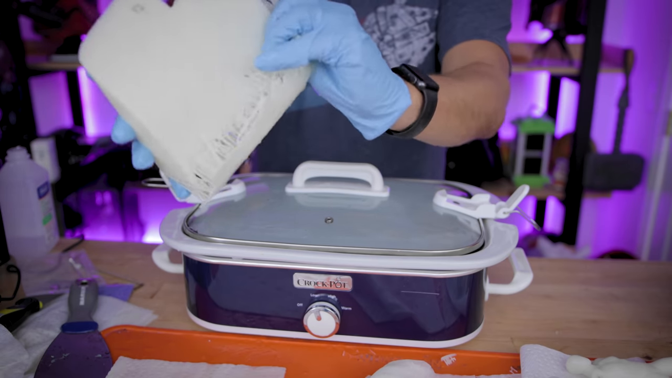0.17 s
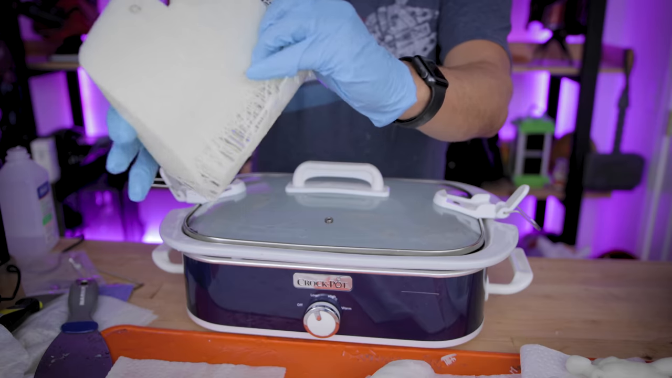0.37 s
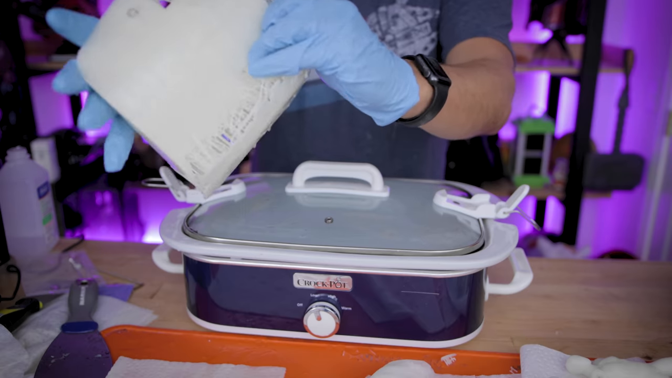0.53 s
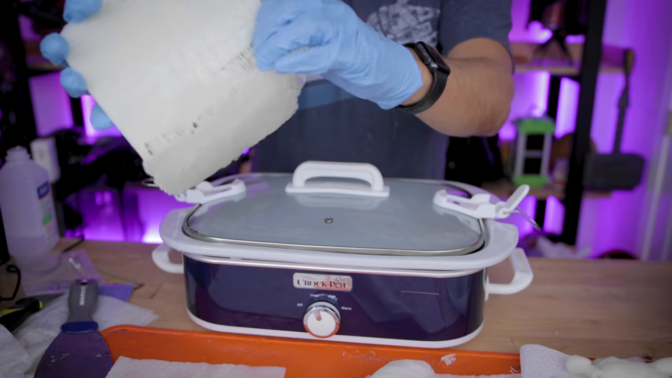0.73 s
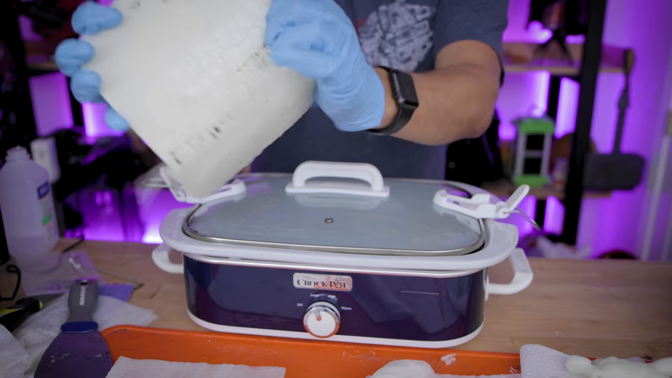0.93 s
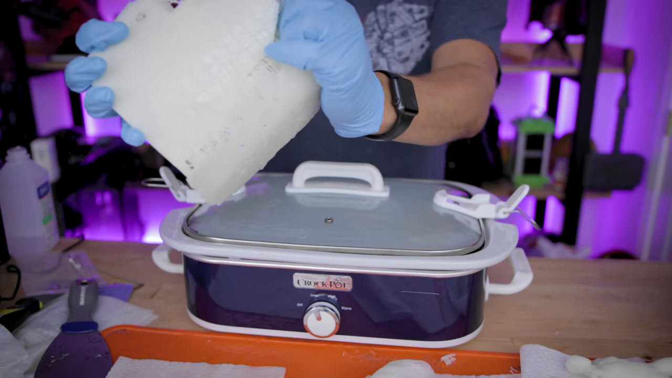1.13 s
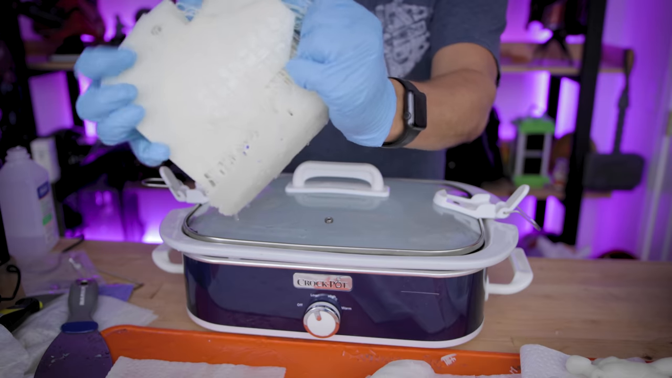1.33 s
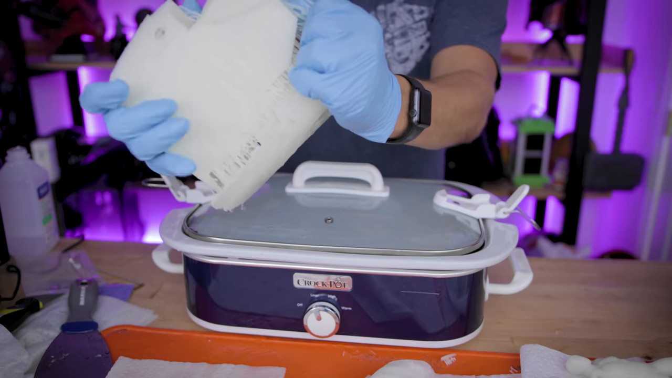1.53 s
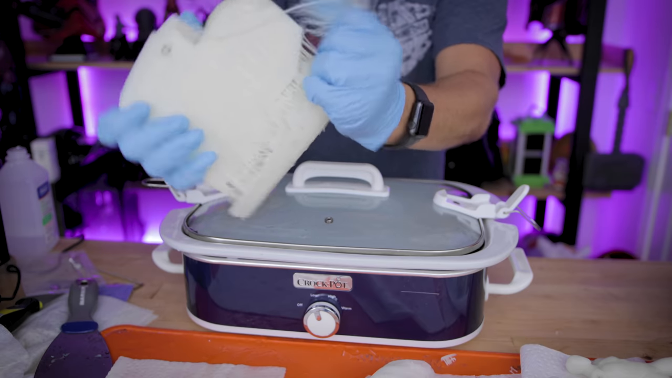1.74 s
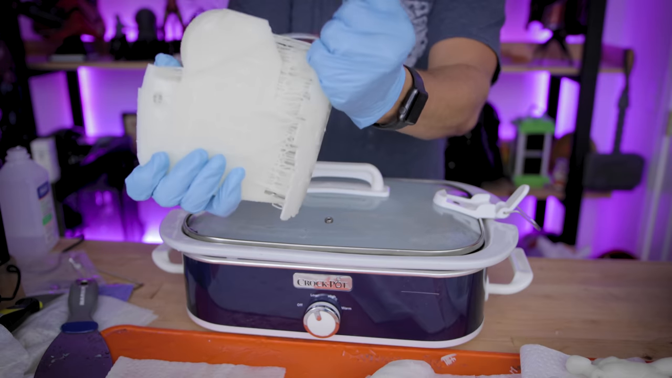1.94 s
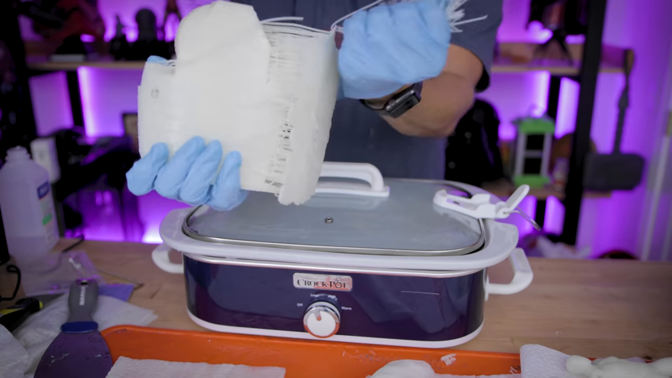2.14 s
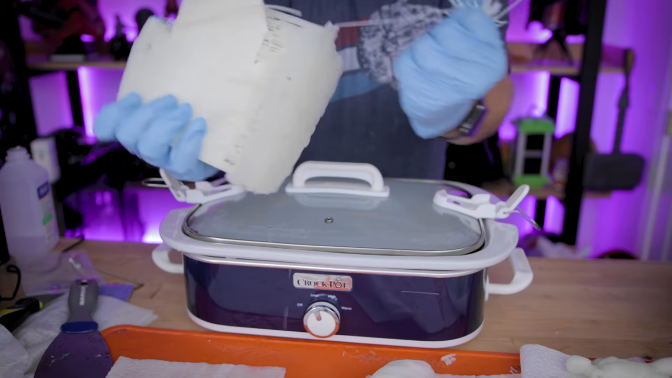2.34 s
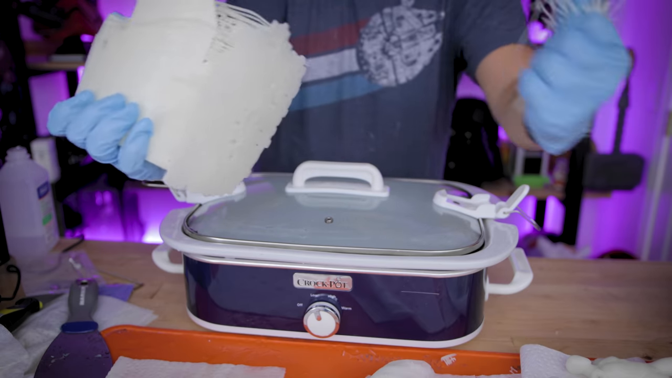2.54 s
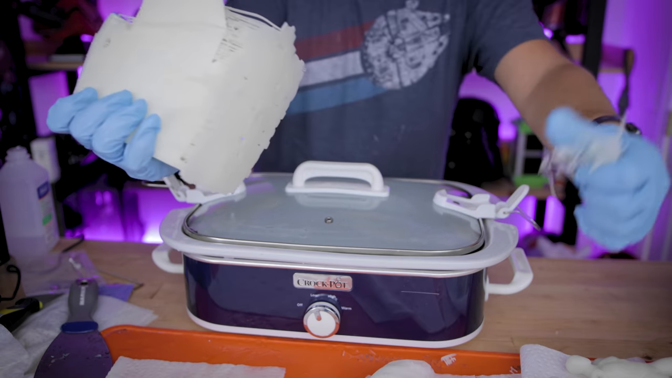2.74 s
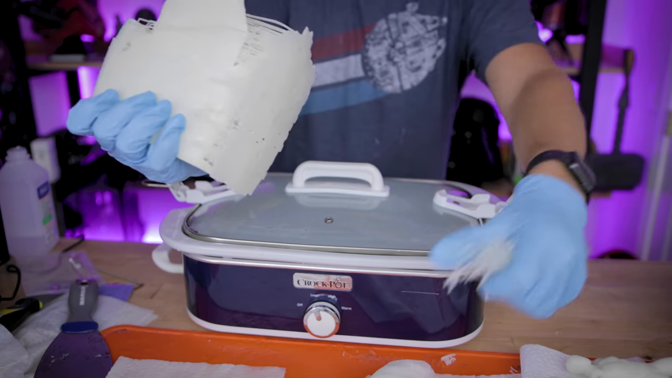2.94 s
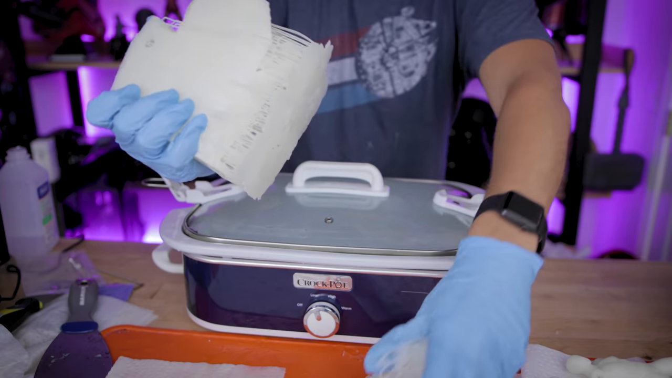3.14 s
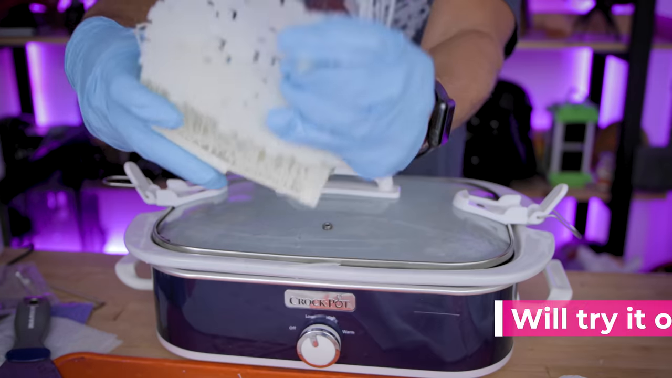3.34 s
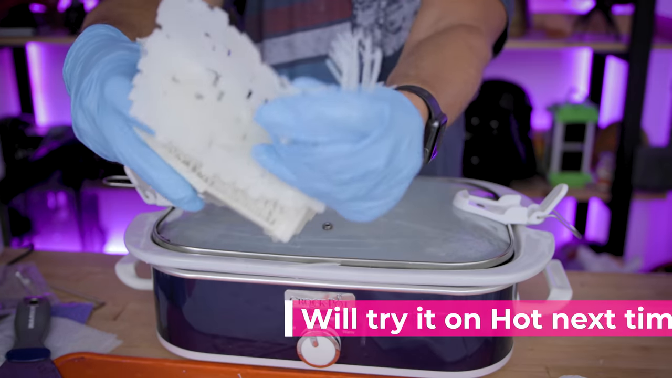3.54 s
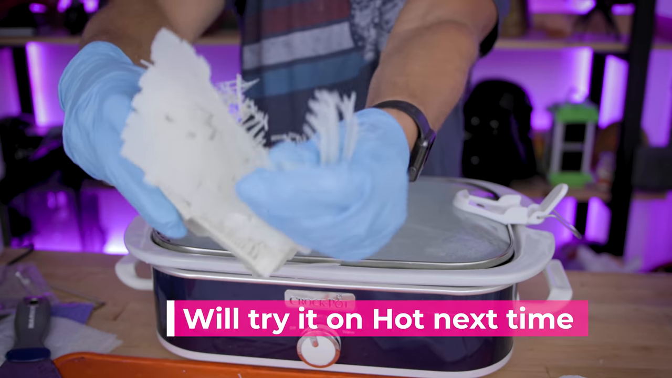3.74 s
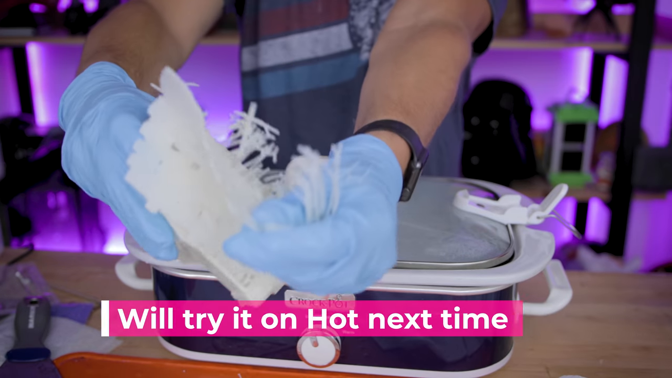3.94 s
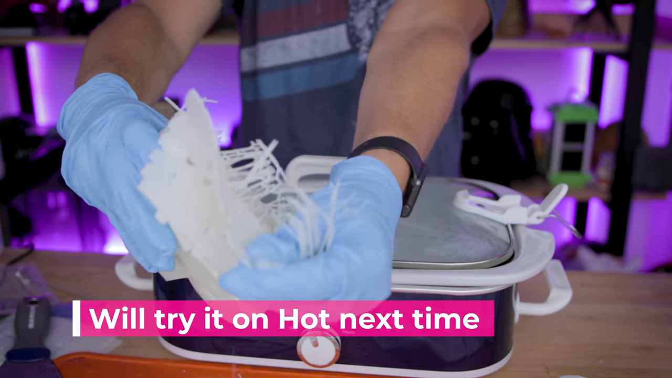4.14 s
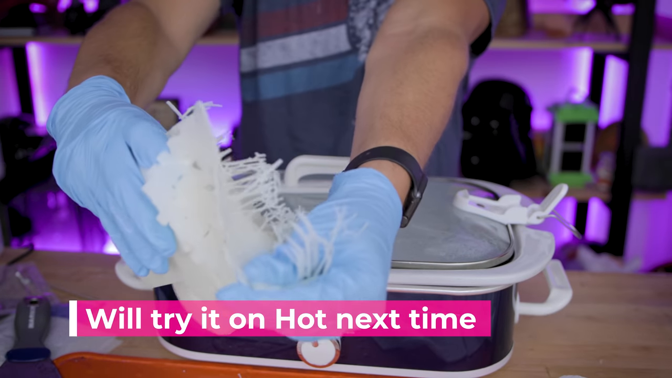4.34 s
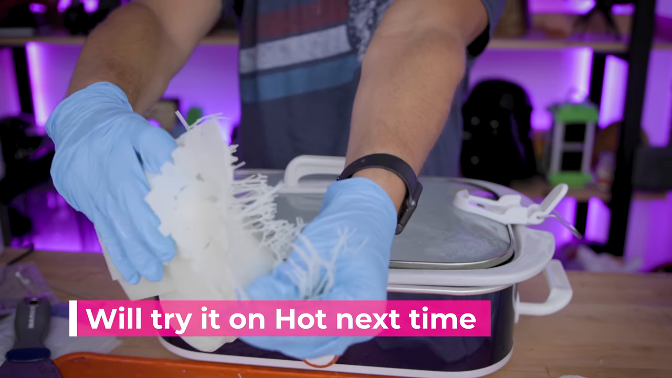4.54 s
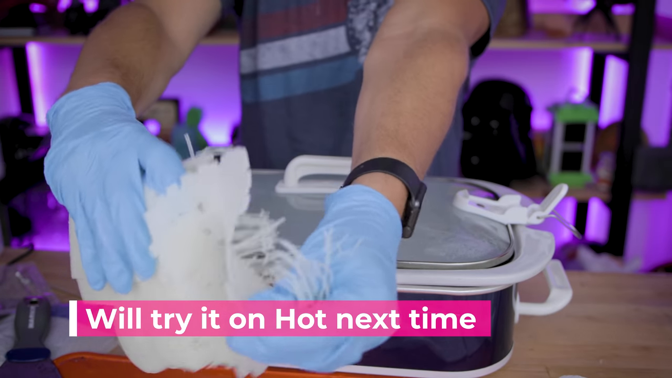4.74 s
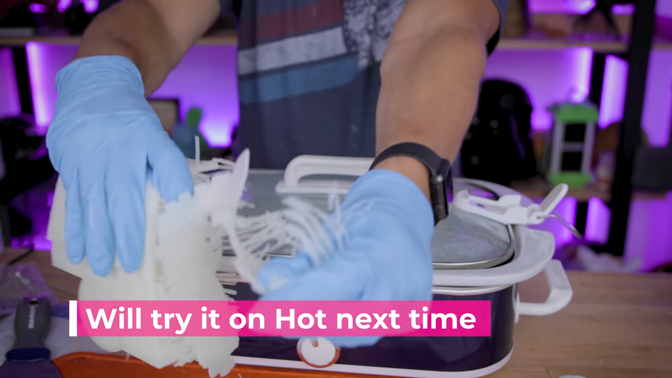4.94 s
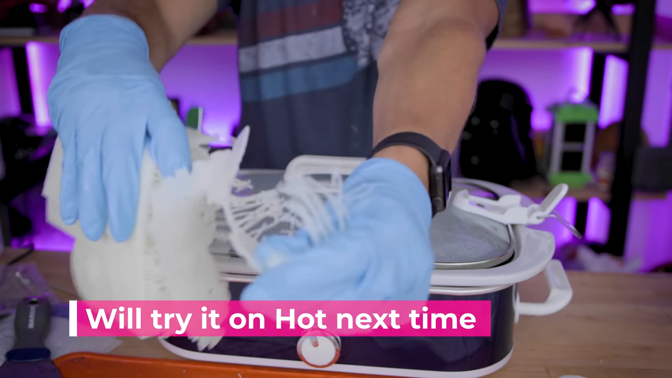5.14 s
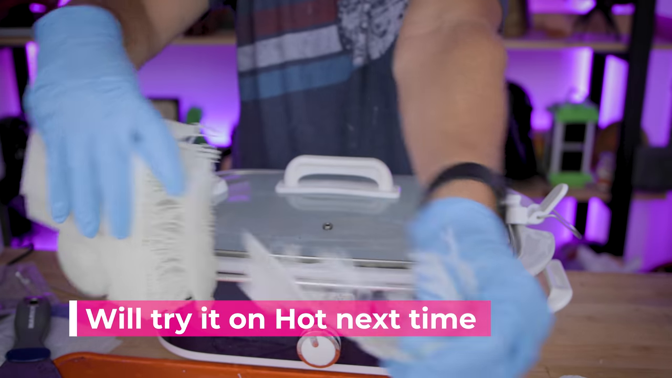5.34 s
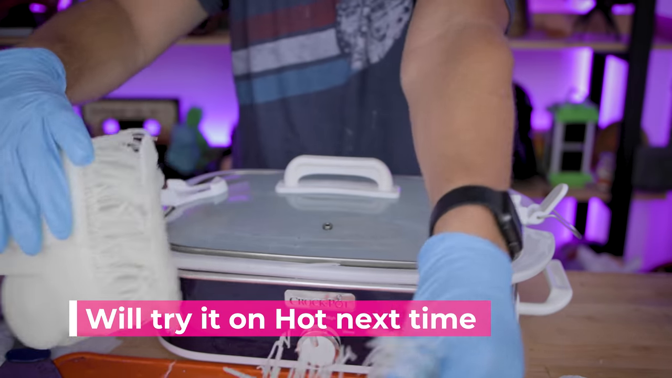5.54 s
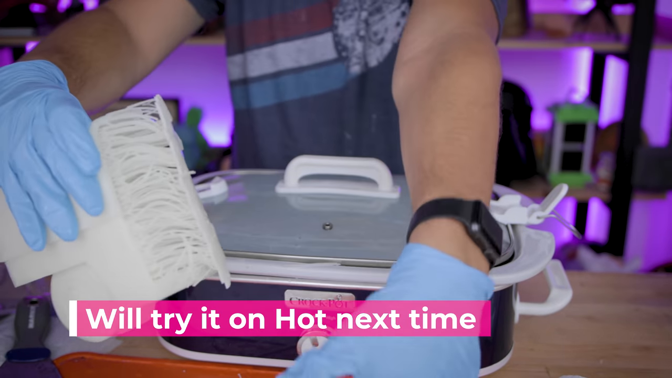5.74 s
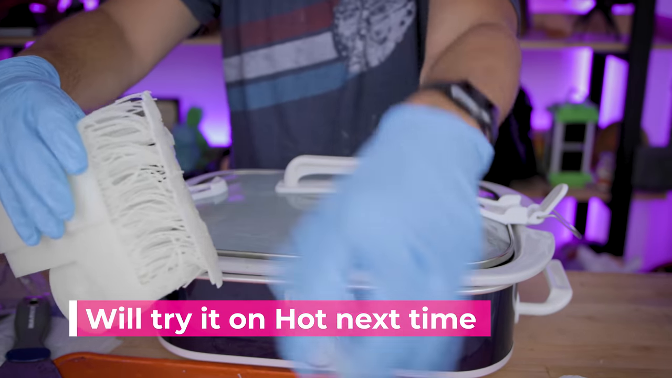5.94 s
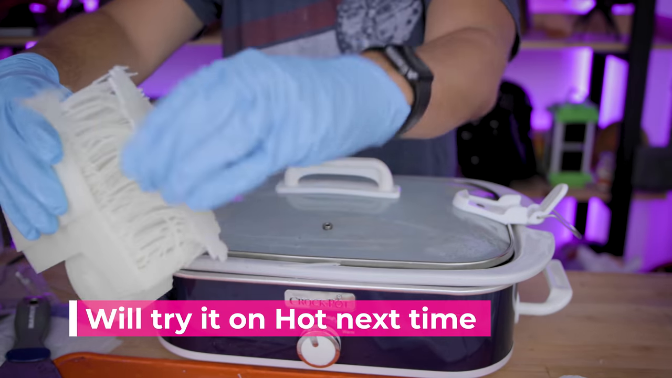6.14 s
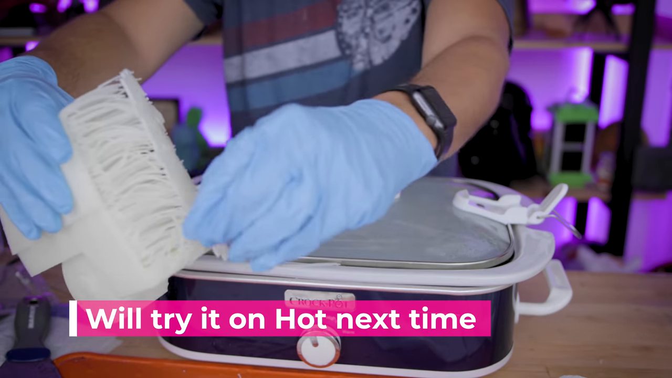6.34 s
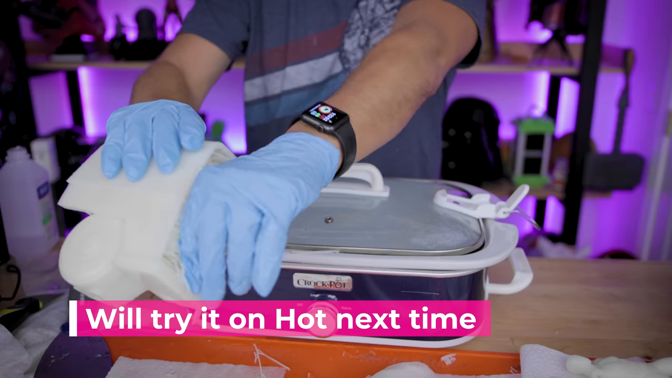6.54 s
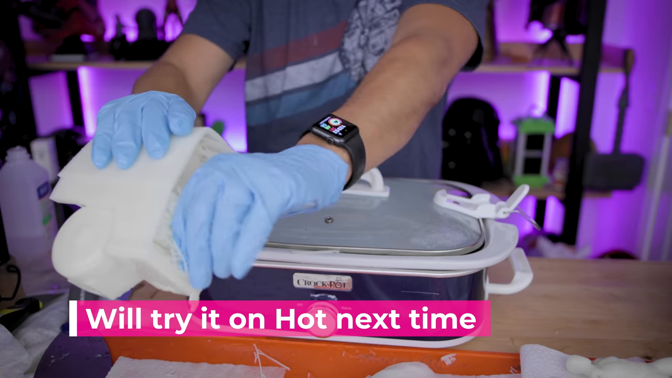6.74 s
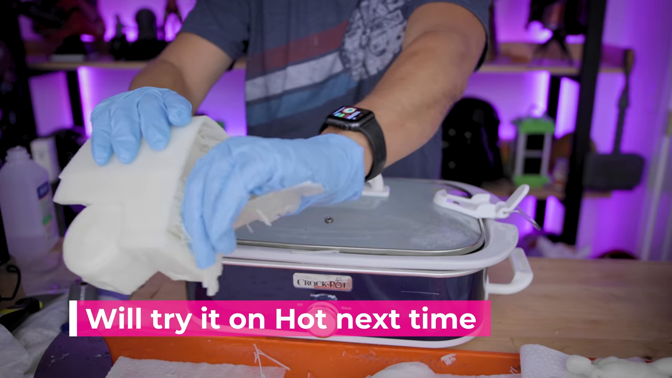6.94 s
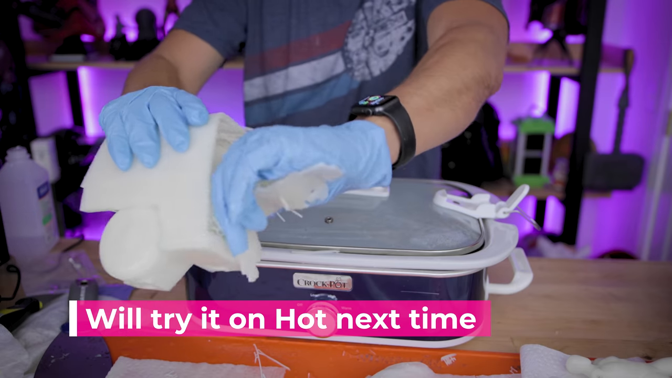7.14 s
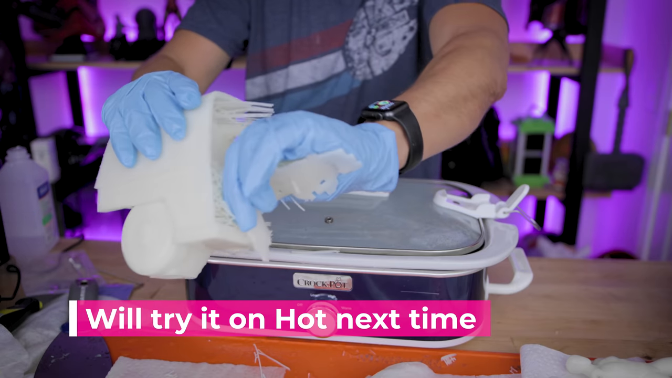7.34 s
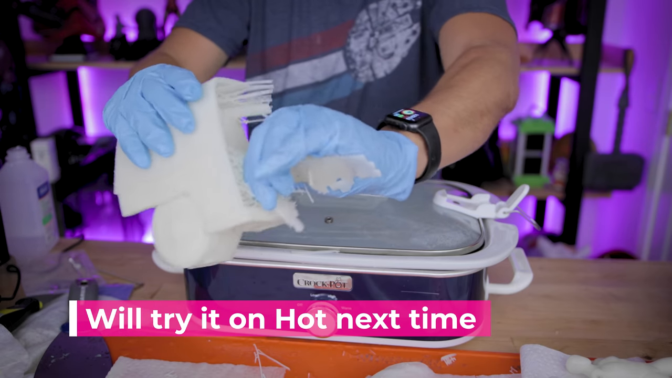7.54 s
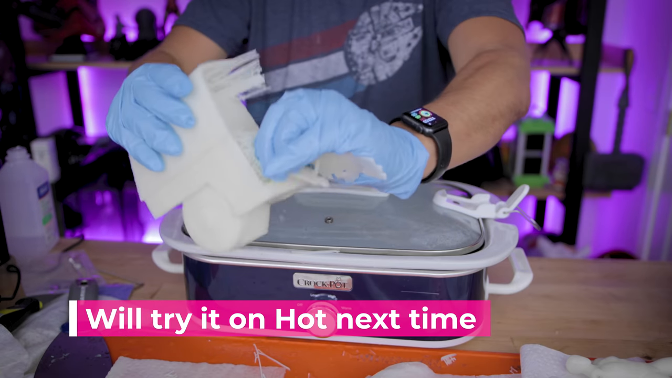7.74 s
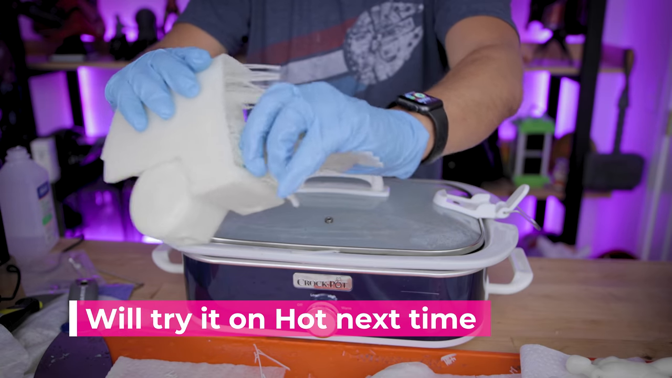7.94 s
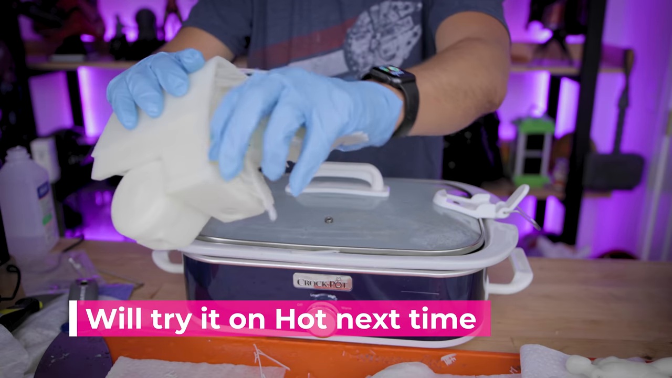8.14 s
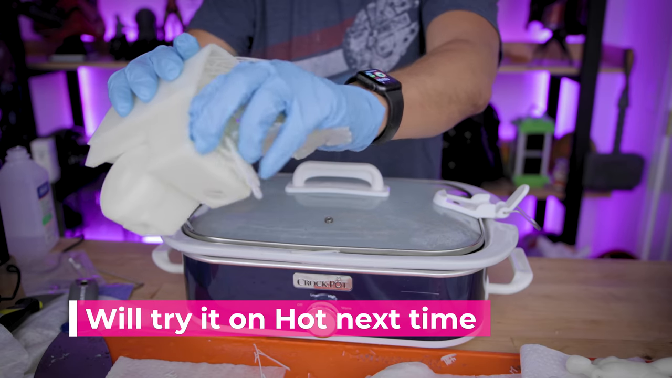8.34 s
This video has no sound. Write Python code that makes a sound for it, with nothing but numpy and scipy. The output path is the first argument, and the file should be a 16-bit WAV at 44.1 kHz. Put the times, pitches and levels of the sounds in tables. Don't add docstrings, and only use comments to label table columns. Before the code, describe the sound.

Brittle plastic struts snap and crackle in sharp bursts as gloved hands tear them off, with rubbery rustle and faint fan hum in a small room.

```python
import sys
import numpy as np
from scipy import signal
from scipy.fft import rfft, irfft
from scipy.io import wavfile
from scipy.ndimage import uniform_filter1d

SR = 44100
rng = np.random.default_rng(int(sys.argv[2]) if len(sys.argv) > 2 else 0)


def file_out(sig):
    cols = np.atleast_2d(sig).T
    lim = np.clip(cols, -1, 1)
    pcm = np.round(lim * 32767).astype(np.int16)
    wavfile.write(sys.argv[1], SR, pcm)


def invert_db(level):
    return 10 ** (np.asarray(level, dtype=float) / 20)


N = 374409


def unit(x):
    return x / np.sqrt(np.mean(x ** 2))


def colour(x, points):
    hz, db = np.transpose(points)
    f = np.maximum(np.arange(len(x) // 2 + 1) * SR / len(x), 1)
    gain = invert_db(np.interp(np.log(f), np.log(hz), db))
    return irfft(rfft(x) * gain, len(x))


def highpass(x, hz, order):
    return signal.sosfilt(signal.butter(order, hz, "high", fs=SR, output="sos"), x)


def walk(rate_hz):
    hold = int(SR / rate_hz)
    steps = np.repeat(rng.standard_normal(N // hold + 1), hold)
    slewed = uniform_filter1d(uniform_filter1d(steps, hold), hold)
    return 0.95 * slewed[:N]


def add(out, times, waves):
    for s, wave in zip(times, waves):
        i = min(max(int(s * SR), 0), len(out) - 1)
        out[i:i + len(wave)] += wave[:len(out) - i]
    return out


def ring(push, modes, chance, detune, scatter_db):
    t = np.arange(push.shape[-1]) / SR
    body = 0
    for k, (hz, db, t60) in enumerate(modes):
        pitch = np.minimum(hz * np.exp(detune * chance[:, [k]]), 0.45 * SR)
        level = invert_db(db + scatter_db * chance[:, [-1 - k]])
        decay = invert_db(-60 * t / np.maximum(t60, 1e-3))
        body = body + level * np.sin(2 * np.pi * pitch * t) * decay
    waves = signal.fftconvolve(push, np.broadcast_to(body, push.shape), axes=-1)[..., :len(t)]
    return waves / np.abs(waves).max(axis=-1, keepdims=True)


def machines():
    # from_s, fan_db, hiss_db, hum_db
    places = [
        (0, -70.5, -75, -74),
        (2.2, -74.5, -80, -70),
        (3.33, -70, -94, -75.5),
        (5.5, -72.5, -88, -74.5),
        (6.489, -73.5, -81, -79.5),
        (8.271, -70.5, -93.5, -83),
    ]
    # hz, db (per Hz)
    fan_colour = [(12, -37), (20, -7), (64, -5), (98, -3), (178, -7), (329, -9.5), (431, -11), (608, -13),
                  (742, -17), (1500, -27), (1950, -57.5), (3300, -120)]
    # hz, db (per Hz)
    hum_colour = [(30, -28.5), (55, -7), (80, -6), (107, 0.5), (128, -7), (180, -34)]
    # hz, db (per Hz)
    hiss_colour = [(4500, -30), (5200, -9), (6500, -11), (7800, -5), (8800, -1), (10000, -6), (11300, 0),
                   (12700, -7), (14000, -1), (15200, -7), (16500, -20)]
    settle_s = 0.05
    t = np.arange(N) / SR
    from_s, *levels = np.transpose(places)
    place = np.maximum(np.searchsorted(from_s, t) - 1, 0)
    fan_db, hiss_db, hum_db = (uniform_filter1d(db[place], int(settle_s * SR)) for db in levels)
    fan = unit(colour(rng.standard_normal(N), fan_colour)) * invert_db(fan_db + 3.5 * walk(28))
    hiss = unit(colour(rng.standard_normal(N), hiss_colour)) * invert_db(hiss_db + 0.92 * walk(23))
    hum = unit(colour(rng.standard_normal(N), hum_colour)) * invert_db(hum_db)
    return fan + hum + hiss


def gloves():
    # middle_s, length_s, rustle_db
    rubs = [(0.046, 0.3, -61), (.39, 0.072, -70), (0.51, 0.1, -65.5), (0.59, 0.051, -66),
            (0.7, 0.13, -75.5), (0.802, 0.051, -64), (0.89, 0.076, -65.5), (1.344, 0.36, -60),
            (1.997, 0.36, -81), (3.13, 0.14, -78.5), (4.307, 0.86, -68), (5.542, 0.28, -70.5),
            (5.808, 0.077, -59.5), (5.938, 0.14, -68), (6.078, 0.11, -75), (6.224, 0.081, -75),
            (6.706, 0.13, -78), (7.284, 0.2, -65), (8.076, 0.11, -69), (8.141, 0.057, -62.5),
            (8.25, 0.054, -68.5), (8.345, 0.025, -86.5), (8.467, 0.033, -86)]
    # hz, db (per Hz)
    rustle_colour = [(410, -16.5), (900, -6), (2500, -1.5), (3350, -2), (3950, 3), (4900, -6.5),
                     (8000, -11), (15400, -31.5)]
    t = np.arange(N) / SR
    creaks = rng.standard_normal(N) * invert_db(1.8 * walk(25) + 4.0 * walk(150))
    motion = invert_db(-75.5)
    for middle_s, length_s, db in rubs:
        motion = motion + invert_db(db) * np.exp(-(2 * (t - middle_s) / length_s) ** 2)
    return unit(colour(creaks, rustle_colour)) * motion


def breaks():
    # start_s, crack_peak_db, shell_rel_db,
    # neighbours_rel_db, freed_hz
    first_pulls = [(0.0054, -25, -7, -9, 1310), (0.0317, -21, -15, -10.5, 2440),
                   (0.062, -34.5, 0, -7, 3610), (0.1333, -23, -8, -8, 3620), (0.1535, -26, -24, -10, 2340),
                   (1.0784, -29, -15, -15.5, 3510), (1.1094, -20.5, -9, -26.5, 3510),
                   (1.1277, -17.5, -11, -8.5, 3830), (1.2768, -30.5, -19, -7.5, 2450),
                   (1.302, -46, 0, 8.5, 1950), (1.3138, -15.5, -18, -10, 3400),
                   (1.4238, -39.5, -26, -18, 4160), (1.4384, -33, -25, -20, 4300),
                   (1.7227, -31.5, -12, -6, 4090), (1.742, -32, -15, -12, 3840),
                   (1.8052, -25.5, -9.5, -14.5, 2420), (1.8294, -13.5, -14, -12, 3670),
                   (1.8577, -19.5, -26, -10.5, 3270), (1.8922, -22, -16, -9, 4000),
                   (1.9018, -31, -17, -12, 2830), (1.9144, -27, -21.5, -19, 3700),
                   (1.961, -41, -25, -6, 3470), (2.066, -35.5, -12, -7, 3280),
                   (2.0838, -32.5, -26, -30, 2920), (2.1294, -33, -6.5, -23, 3100),
                   (2.1579, -22.5, -10, -6.5, 2820), (2.4496, -34.5, -10, -8, 3400)]
    peel_raft = [(3.5769, -17, -15, -6.5, 3600), (3.5987, -23.5, -19, -4.5, 1850),
                 (3.6962, -18, -17.5, -4.5, 5260), (3.7062, -15, -16.5, -23, 3500),
                 (3.7654, -24.5, -15, -6.5, 1850), (3.7953, -17.5, -21, -7.5, 3520),
                 (3.837, -17.5, -14.5, -7, 3460), (3.8448, -27, -11, 3.5, 1910),
                 (3.882, -22, -15, -15, 3460), (3.913, -21, -22.5, -9.5, 3560),
                 (3.9984, -20, -15, -7, 2190), (4.0474, -14, -21.5, -13, 3270),
                 (4.1083, -20.5, -15, -7, 2090), (4.122, -18.5, -19.5, -10.5, 3600),
                 (4.169, -25.5, -16.5, -10.5, 2130), (4.2174, -26.5, -20, -9.5, 1364),
                 (4.2264, -30, -12, -4.5, 1480), (4.2377, -33, -15, -3.5, 2200),
                 (4.25, -20.5, -10, -9.5, 2220), (4.263, -25.5, -14, -5, 2200),
                 (4.2792, -11, -19, -11.5, 4250), (4.2881, -33, -14, -14, 1740)]
    tear_raft = [(4.4016, -13, -16.5, -17.5, 3840), (4.4383, -13.5, -18.5, -7, 2280),
                 (4.4602, -20, -17.5, -14, 2210), (4.4758, -13, -17.5, -13, 2070),
                 (4.503, -31, -7, -1, 2110), (4.5342, -25.5, -12, -7, 2180),
                 (4.555, -34.5, -19.5, -13, 2100), (4.602, -44, -7, 0, 1800),
                 (4.6482, -14.5, -19.5, -17, 1900), (4.7285, -33.5, -12.5, -9.5, 2290),
                 (4.7655, -14.5, -25.5, -12, 2200), (4.924, -14, -19, -16.5, 1950),
                 (4.952, -24.5, 0.5, -4.5, 1310), (4.9651, -15.5, -30.5, -3.5, 2480),
                 (5.226, -16, -25.5, -16.5, 4200), (5.3509, -7.5, -21, -14.5, 3130),
                 (5.3756, -15, -17, -6.5, 2370), (5.406, -26.5, 7.5, 5, 1280),
                 (5.4664, -44, 11.5, -15, 1310), (5.6086, -40, -28, -7.5, 2700),
                 (6.0404, -35, -37, -17, 4840)]
    strip_edge = [(6.4908, -38.5, -13.5, -10, 4150), (6.6194, -26, -20, -5.5, 3640),
                  (6.631, -34, -32, -10, 4000), (6.7366, -28, -23.5, -15, 3760),
                  (6.775, -28, -24, -14.5, 1320), (6.8024, -42, -7, -21, 3600),
                  (6.8944, -21, -12.5, -3.5, 1970), (6.911, -41, -14, -4, 2140),
                  (6.9415, -43, -3, -17, 2290), (6.985, -28, -40, -15, 4070), (7.011, -30, -29, -25, 4170),
                  (7.0825, -18.5, -27, -16, 4370), (7.2046, -16.5, -25, -12, 4000),
                  (7.2205, -15, -33, -15.5, 2650), (7.333, -16, -26, -14.5, 1250),
                  (7.3683, -17.5, -20, -12, 1740), (7.4985, -12, -28.5, -12.5, 2280),
                  (7.548, -36, -26.5, -12.5, 2700), (7.5738, -34.5, -24, -6, 1700),
                  (7.7086, -25, -29, -11, 1770), (7.7186, -18.5, -27, -17, 2120),
                  (7.7993, -7.5, -23.5, -23, 4100), (7.8194, -17.5, -27, -9.5, 1700),
                  (7.8322, -10.5, -26, -31.5, 4000)]
    doubles = [(0.0374, -24, -13, -8.5, 2350), (1.1121, -15.5, -21, -20, 2520),
               (1.836, -16.5, -16, -23.5, 3000), (1.889, -25.5, -15, -26, 4860),
               (3.58, -25, -20, -34, 3600), (4.4722, -25, -23, -11, 3800), (4.9475, -43, -10, -8, 3000),
               (4.9612, -21.5, -25, -24.5, 4200), (5.3539, -13, -19.5, -4.5, 4000),
               (5.374, -28, -26.5, -17.5, 4200), (5.4101, -29, -1.5, -5.5, 2520),
               (6.897, -22, -13, -12, 3300), (7.1987, -28, -31, -5, 4000), (1.1305, -20, -27, -11.5, 2600),
               (4.4395, -27, -20.5, -13, 3500), (3.6011, -22, -27, -19, 3900)]
    # start_s, crack_peak_db
    small_cracks = [(0.362, -62.5), (0.405, -58), (0.584, -54), (0.799, -52), (0.8884, -47.5), (1.011, -47.5),
                    (1.6244, -51), (2.1993, -44), (3.296, -49), (3.31, -45.5), (3.482, -57), (3.5505, -52.5),
                    (5.5443, -51), (5.649, -62), (5.7768, -51), (5.7954, -50), (5.8306, -55), (5.903, -51.5),
                    (5.9289, -49.5), (5.9466, -45.5), (6.2015, -51), (6.5185, -46), (6.5525, -45), (6.6643, -40),
                    (6.9992, -47), (7.6113, -38), (8.0643, -52), (8.1144, -43.5), (8.1598, -46), (8.337, -49.5),
                    (7.833, -15), (3.686, -37), (4.363, -50), (4.387, -52), (5.59, -49), (6.58, -53),
               (6.72, -52), (6.866, -46.5), (7.2075, -21), (7.651, -47.5), (7.69, -46.5), (7.994, -53),
               (0.4655, -59), (0.5717, -65), (0.52, -55), (0.6695, -62), (0.7078, -58), (0.836, -53),
               (0.8735, -62), (1.052, -49), (7.189, -49)]
    ticks = [(s, db - 0.5, -18, -8, 3600) for s, db in small_cracks]
    return first_pulls + peel_raft + tear_raft + strip_edge + ticks + doubles


def snaps(size=2048, count=128):
    # hz, db, t60_s
    shell_modes = [(400, -5, .02), (442, 0, .04), (530, -2, .025), (620, -4, .018), (790, -10, .012),
                   (980, -17, .01)]
    # hz, db, t60_s
    strut_modes = [(1310, -1, .007), (1650, -2, .004), (1900, 0, .004), (2250, 0, .0035)]
    # hz, db, t60_s
    crack_modes = [(2700, -2, .0025), (3200, -2, .0025), (3700, 0, .0028), (4250, 0, .0025),
                   (4900, -3, .002), (5600, -4, .0015)]
    # hz, db, t60_s
    edge_modes = [(6400, 0, .0012), (7600, 0, .0012), (8800, -2, .001), (10000, -1, .001),
                  (11500, -4, .0008), (13500, -6, .0008), (15300, -9, .0008)]
    # at_s, edge_db
    facing = [(0.1, -1), (1.1, -0.5), (1.8, -0.5), (2.3, -4.5), (3.58, -7), (3.75, 1), (4.15, 3.5),
              (4.45, 0), (4.7, 1.5), (4.95, -4.5), (5.25, 1.9), (5.4, 2.5), (6.04, -15), (6.6, -4),
              (6.9, 3.5), (7.2, 5.8), (7.5, -2), (7.8, 5.7)]
    # delay_s, db
    bench_echo = (0.0015, -4.6)
    s, crack_db, shell_db, strut_db, hz = np.transpose(breaks())[:, :, None]
    rows = np.arange(len(s))
    chance = rng.standard_normal((len(s), count + 67))
    shell_luck, strut_luck, crack_luck, edge_luck = np.split(chance[:, count:-3], 4, axis=1)

    t = np.arange(count) / SR
    push = np.zeros((2, len(s), size))
    push[0, :, :count] = 0.063 * chance[:, :count] ** 3 * np.exp(-t / 0.00081)
    push[:, :, 0] = np.sign(chance[:, 0])
    echo_s, echo_db = bench_echo
    lag = (echo_s * SR * np.exp(0.2 * chance[:, -1])).astype(int)
    push[0, rows, lag] += invert_db(echo_db) * push[0, :, 0]
    sharp = push.copy()
    t = np.arange(4 * count) / SR
    aftershock = rng.standard_normal((len(s), 4 * count)) ** 3 * np.exp(-t / 0.003)
    push[0, :, :4 * count] += 0.057 * aftershock

    edge_db = -4 + 5 * np.log2(hz / 2500) + 0.12 * (crack_db + 13.0)
    edge_db = edge_db + 5.5 * chance[:, [-3]] + np.interp(s, *np.transpose(facing))
    stiffness = np.where(s < 3.35, 1.17, 1)
    held = [(f * stiffness, db, t60) for f, db, t60 in shell_modes]
    freed_db = np.where(hz < 2500, strut_db + 3.5, -7.5)
    freed_room_gain = invert_db([0, -3.5])[:, None, None]

    crack = highpass(ring(push, crack_modes, crack_luck, 0.04, 1.5), 2100, order=3)
    struts = invert_db(strut_db + 4.5) * highpass(ring(push, strut_modes, strut_luck, 0.04, 3.5), 1220, order=4)
    edge = invert_db(edge_db) * highpass(ring(sharp, edge_modes, edge_luck, 0.04, 1.5), 4600, order=3)
    freed = highpass(ring(push, [(hz, 0, 18 / hz)], shell_luck, 0, 0), 1500, order=4)
    freed = invert_db(freed_db) * freed * freed_room_gain
    shell = invert_db(shell_db + 2.5) * highpass(ring(push, held, shell_luck, 0.035, 3.5), 380, order=4)
    return s[:, 0], np.array([crack + shell, struts + edge, freed]) * invert_db(crack_db + 0.5)


def room(x, size=16384):
    # hz, db, t60_s
    bands = [(240, -27, 0.62), (556, -15, 0.24), (940, -24.5, 0.35), (1850, -15.5, 0.21),
             (4000, -17.5, 0.25), (7900, -20, 0.2), (14400, -29, 0.13)]
    t = np.arange(size) / SR
    reply = np.zeros(size)
    for hz, db, t60 in bands:
        shape = [(hz / 4, -40), (hz / 1.575, -3), (hz, 0), (hz * 1.23, -3), (hz * 4, -40)]
        band = colour(rng.standard_normal(size), shape)
        reply += invert_db(db - 10.5) * band * invert_db(-60 * t / t60) * (1 - np.exp(-t / 0.000074))
    return signal.fftconvolve(x, reply)[:N]


def knocks(size=8192):
    # start_s, peak_db, pitch_hz, t60_s
    hits = [(1.8294, -26, 580, 0.047), (3.306, -46.5, 400, 0.051), (4.4385, -27, 413, 0.11),
            (4.9528, -25, 516, 0.097), (5.4095, -22, 314, 0.23), (5.719, -48.5, 460, 0.059),
            (5.7805, -31.5, 223, 0.035), (5.801, -37, 199.5, 0.022), (5.818, -46, 165.7, 0.1),
            (6.4925, -38.5, 75, 0.0059), (5.409, -26.5, 426, 0.08), (5.4135, -22, 773, 0.048),
            (5.416, -24.5, 605, 0.081), (5.7805, -56, 327, 0.035), (5.792, -54, 416, 0.035),
            (3.297, -44.5, 450, .03), (3.3095, -41.5, 590, 0.036), (3.319, -45, 405, .04),
            (5.424, -27.5, 480, 0.11), (4.966, -34, 446, 0.28)]
    # pitch_multiple, db
    overtones = [(.5, -3.5), (0.76, -17), (1.001, 12.5), (1.4, 3), (1.8, -5), (2.101, -7), (2.499, -4),
                 (2.85, -11)]
    s, peak_db, hz, t60 = np.transpose(hits)[:, :, None]
    t = np.arange(size) / SR
    chance = rng.standard_normal((len(s), size))
    push = t * np.exp(-t / 0.000067) + 2e-5 * chance * np.exp(-t / 0.0069)
    modes = [(hz * k, db, t60 / max(k, 1)) for k, db in overtones]
    waves = invert_db(peak_db) * ring(push, modes, chance[:, -16:], 0.03, 2.0)
    waves = [highpass(wave, 0.6 * f, order=3) for wave, f in zip(waves, hz[:, 0])]
    return add(np.zeros(N), s[:, 0], waves)


def lone_rings(size=32768):
    # start_s, peak_db, pitch_hz, t60_s
    lone_modes = [
        (2.159, -44.5, 1725, .25),
        (2.16, -46, 1810, .2),
        (2.159, -49, 1680, .15),
        (2.1585, -26.5, 1780, 0.043),
        (2.452, -41, 1790, 0.048),
        (2.452, -51, 1750, .06),
        (5.409, -54.5, 288, 0.97),
    ]
    s, peak_db, hz, t60 = np.transpose(lone_modes)[:, :, None]
    t = np.arange(size) / SR
    return add(np.zeros(N), s[:, 0], invert_db(peak_db - 60 * t / t60) * np.sin(2 * np.pi * hz * t))


def scene(places=4):
    s, groups = snaps()
    knocking = knocks()
    sound = machines() + gloves() + knocking + invert_db(-5.5) * room(knocking) + lone_rings()
    for direct, spread in groups:
        add(sound, s, direct)
        for k in range(places):
            sound += room(add(np.zeros(N), s[k::places], spread[k::places]))
    return sound[None]


def low_pass(x):
    return signal.sosfilt(signal.butter(12, 17020, fs=SR, output="sos"), x)


def record(dry):
    top_cut = [(12000, -0.5), (15500, -4), (16000, -10.0), (16900, -27.5), (17200, -65.5)]  # (Hz, dB)
    mix = colour(dry[0], top_cut)[None]
    return low_pass(mix)


dry = scene()
out = record(dry)
file_out(out)
```